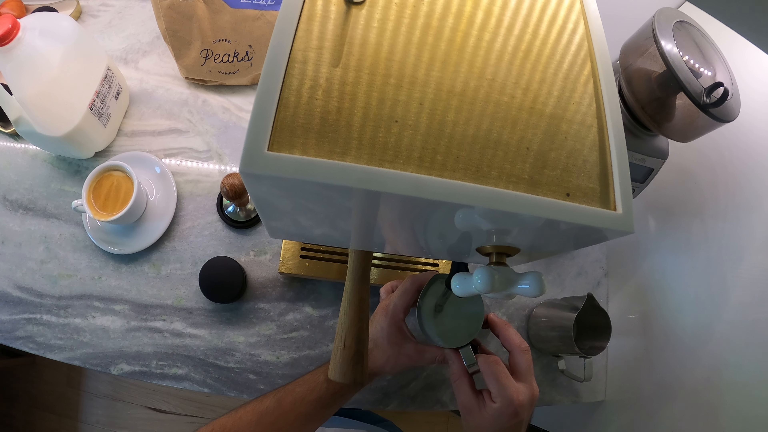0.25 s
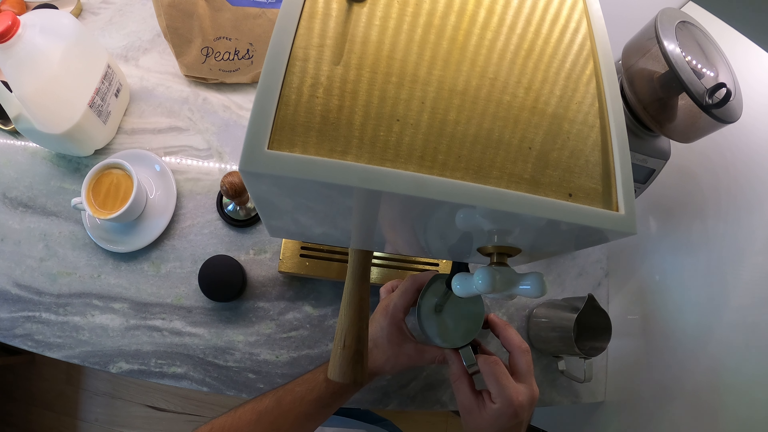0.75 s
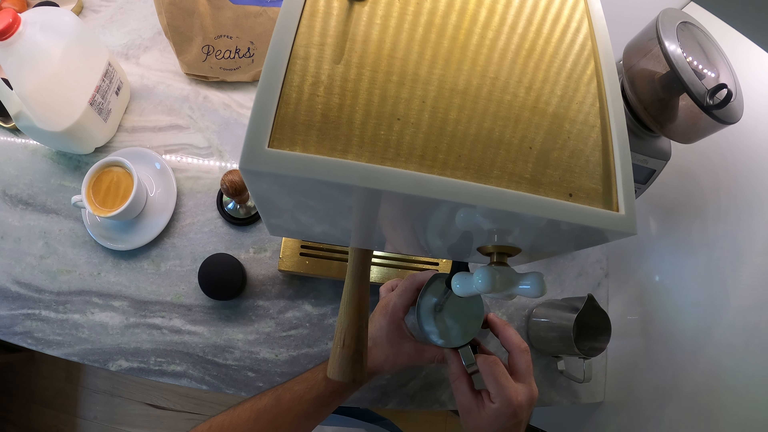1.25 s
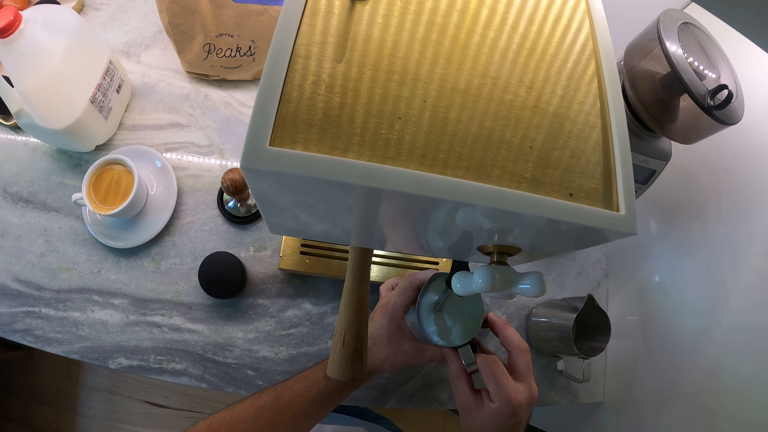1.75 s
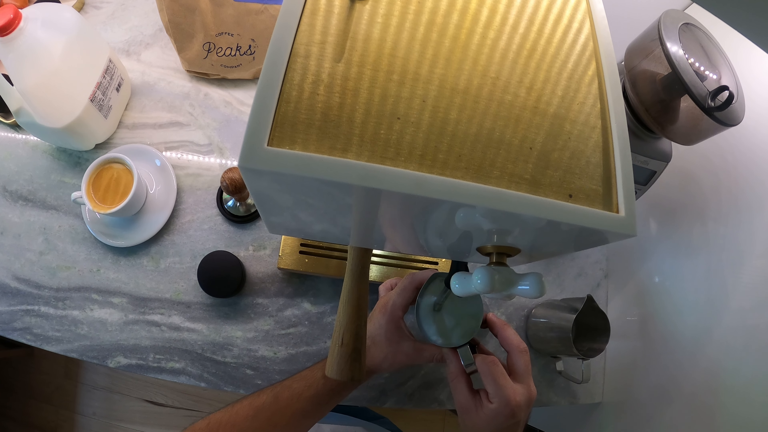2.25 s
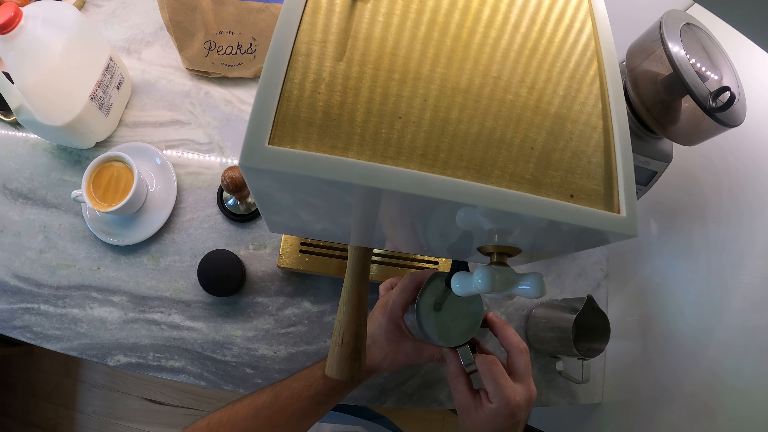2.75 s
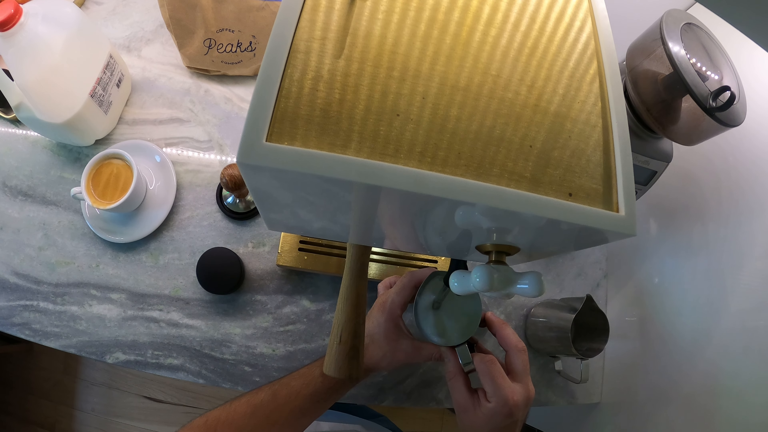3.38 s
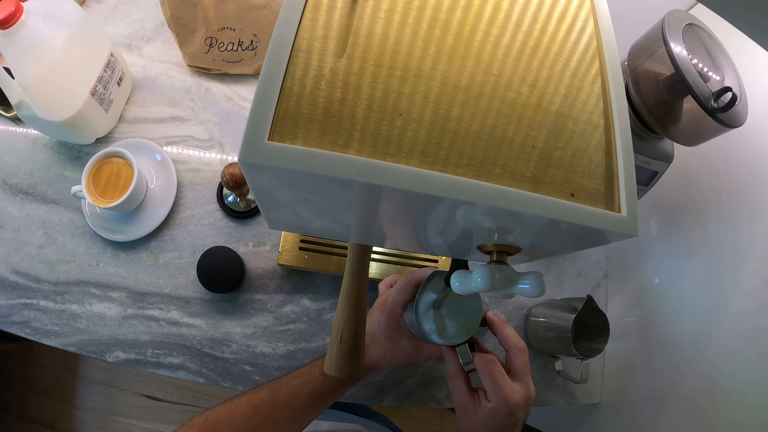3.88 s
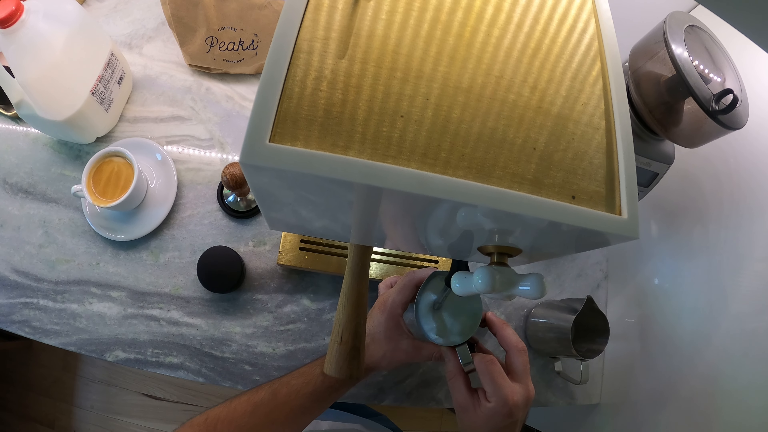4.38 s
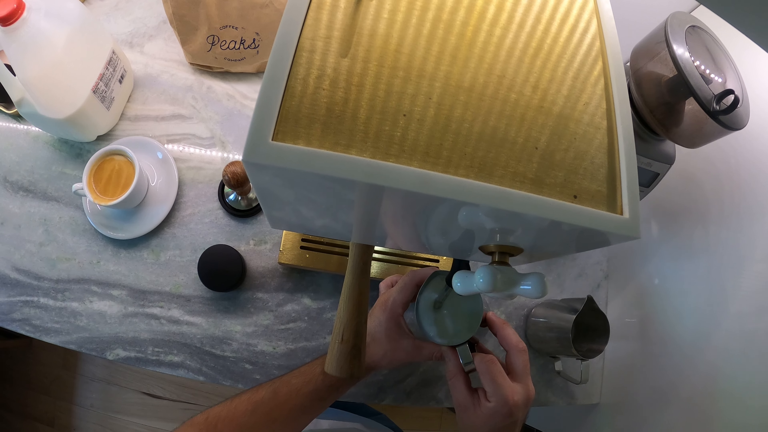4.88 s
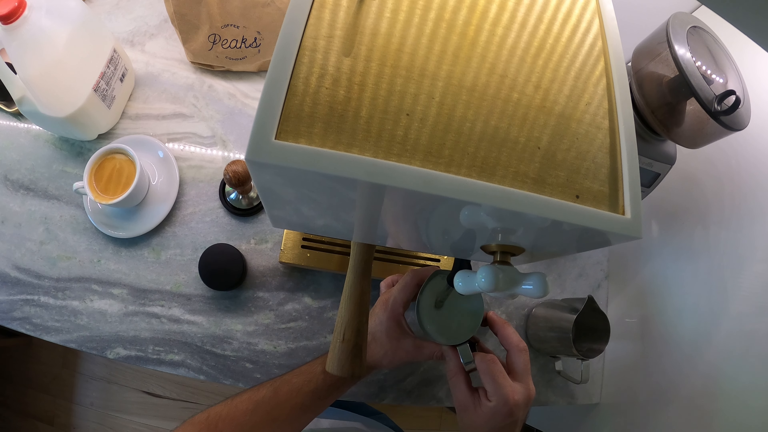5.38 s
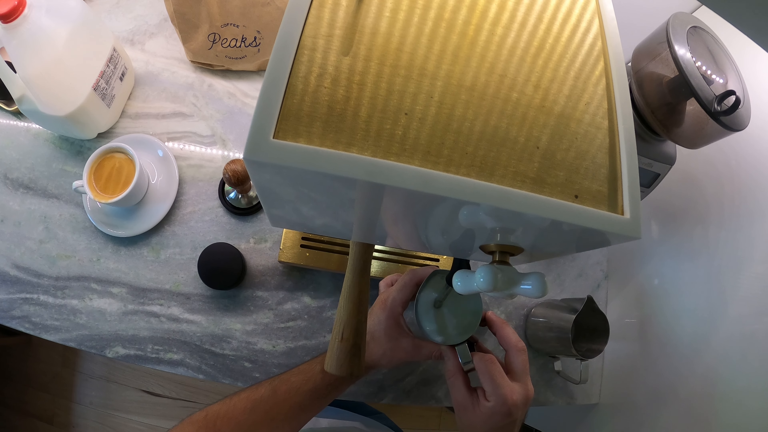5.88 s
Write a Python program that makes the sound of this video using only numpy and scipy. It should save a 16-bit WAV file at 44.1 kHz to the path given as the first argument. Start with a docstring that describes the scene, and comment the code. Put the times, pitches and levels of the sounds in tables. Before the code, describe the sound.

Milk steaming is already under way at 0 seconds and runs unbroken to about 6. A dense, bright hiss rings narrowly through a steel jug, with seething and fine fizz above and a softer roar below. Underneath, a faint low drone of swirling milk wobbles irregularly, and quick soft glugs come in runs, about five a second. Tiny bright air spits click at 0.26, 1.25 and 1.6, a sharper one at 3.6, another light one near 4.9 and the strongest at 5.0. Brief surges thicken the steam around 3.0 to 3.1. The roar gradually swells and gathers into a hoarse medium-high pitch. Around 4.35 the hiss shifts slightly lower, while from about 3.9 the drone fades under thickening foam. Close microphone, short kitchen reflections, very quiet room rumble; no ending stop.

```python
"""A steam wand heats milk in a hand-held steel jug in a kitchen.
From the start, bubble collapses ring the jug as roar, hiss and fizz, over a low drone of swirling milk
(noise bands) and a quiet room rumble; soft glugs come in runs, and the tip spits bright bursts of air.
The roar grows and gathers round one pitch as the milk warms; late on, the tip settles lower,
the jet's lower band takes over from the upper, and thickening foam fades the drone."""
import sys
import numpy as np
from scipy import signal
from scipy.fft import rfft, irfft
from scipy.io import wavfile
from scipy.ndimage import uniform_filter1d

SR = 44100
rng = np.random.default_rng(int(sys.argv[2]) if len(sys.argv) > 2 else 0)


def store_wav(level_fs):
    """Save 16-bit WAV to argv[1]."""
    pcm = np.round(np.clip(np.atleast_2d(level_fs), -1, 1) * 32767)
    wavfile.write(sys.argv[1], SR, pcm.T.astype(np.int16))


N = 270774
TIME = np.arange(N) / SR
HZ = np.maximum(np.fft.rfftfreq(N, 1 / SR), 1)


def from_db(db):
    """Decibels to amplitude gain."""
    return 10 ** (np.asarray(db) / 20)


def rms_one(x):
    """Scale to rms 1."""
    return x / np.sqrt(np.mean(x ** 2) + 1e-20)


def drift(rate_hz):
    """Slow random signal of rms 1: noise low-passed at rate_hz."""
    smooth = rfft(rng.standard_normal(N)) / (1 + (HZ / rate_hz) ** 2)
    return rms_one(irfft(smooth, N))


def colour(x, spectrum, response=1):
    """Filter x by a response and a (pitch_hz, relative_db) curve, steep beyond its ends; rms 1."""
    pitch_hz, relative_db = np.transpose(spectrum)
    ends = np.minimum(HZ / pitch_hz[0], 1) ** 4 * np.minimum(pitch_hz[-1] / HZ, 1) ** 4
    gain = from_db(np.interp(np.log(HZ), np.log(pitch_hz), relative_db))
    return rms_one(irfft(rfft(x) * response * ends * gain, N))


def steady(x, span_s):
    """Level out swells slower than the span by dividing by the running rms."""
    span = max(int(span_s * SR), 2)
    return x / np.sqrt(uniform_filter1d(x ** 2, span) + 1e-12)


def swell(middle_s, length_s):
    """Gaussian bump of height 1, length_s wide at half height."""
    return np.exp2(-np.minimum((2 * (TIME - middle_s) / length_s) ** 2, 50))


def collapses(per_s, spread_db):
    """Bubbles collapse as random impulses; a wider spread makes a few much larger than most."""
    size_db = spread_db * np.minimum(rng.exponential(1, N), 4)
    sizes = from_db(size_db) * rng.standard_normal(N)
    return sizes * (rng.random(N) < per_s / SR)


def jug_response():
    """Jug and milk resonate in narrow bands, which ring on briefly."""
    # resonances of jug and milk: pitch_hz, width_hz, lift_db (of each alone)
    resonances = [(769, 28, 5.5), (993, 32, 2), (1116, 17, 4.5), (1260, 29, 5), (1417, 30, 5.5),
                  (1490, 57, 3.5), (1721, 21, 4), (2277, 17.5, 8), (2888, 13, 10.5), (3110, 36, 4),
                  (3145, 22, 1.5), (3250, 22, 4), (3570, 60, 0.5), (3754, 61, 3.5), (3930, 21, 5.5),
                  (4095, 45, 3.5), (4350, 100, 6.5), (6490, 98, 4)]
    return 1 + sum((from_db(lift_db) - 1) / (1 + 2j * (HZ - pitch_hz) / width_hz)
                   for pitch_hz, width_hz, lift_db in resonances)


def kitchen(wet_db):
    """Room response: direct sound plus a short, exponentially decaying noise tail."""
    t60_s = 0.24
    t = TIME[:SR // 3]
    tail = rng.standard_normal(len(t)) * from_db(-60 * t / t60_s) * (t > .002)
    return 1 + from_db(wet_db) * rfft(tail / np.linalg.norm(tail), N)


def warmed_db(cold_db, change_db):
    """Level as the milk warms, from cold_db by change_db when hot."""
    hot_s, power = 6.04, 1.21
    return cold_db + change_db * (TIME / hot_s) ** power


def surges_db():
    """Steam surges (+) or chokes (-) lift or lower roar, lower jet band and upper jet band."""
    # surges of the steam: middle_s, length_s, roar_db, low_jet_db, high_jet_db
    surge_rows = [(0.125, 0.051, 1, -4, 4.5), (.23, 0.11, 0.5, 4, 0.5), (0.367, 0.082, -1, -2, -3),
                  (0.525, 0.062, -1, 2.5, 3.5), (.79, .06, 2.5, 1.5, 2), (1.113, .06, -1, 5.5, -0.5),
                  (1.3, 0.099, 1, 4.5, 2), (1.45, 0.13, -1, 0.5, -3), (1.64, 0.082, 1, 7, 1.5),
                  (2.035, 0.072, 2.5, 1.5, 0), (2.35, 0.13, 0, 6.5, 2.5), (2.47, .05, 2, -1.5, -4),
                  (2.73, 0.046, 0.5, -1, 3), (3.023, 0.047, 5, 8, 4.5), (3.113, 0.063, 6.5, 0, 5),
                  (3.187, 0.092, 1, -5, -1.5), (3.48, .1, -0.5, -2, -1), (3.606, .07, -1, 8.5, 2),
                  (3.786, 0.11, 1.5, 2, 2), (3.936, 0.077, 3.5, -2, 1), (4.07, 0.063, 3, 4, 2.5),
                  (4.21, 0.047, 0, -6, -3), (4.488, 0.049, 0, 8.5, 4.5), (4.735, .07, -0.5, 5, 3),
                  (4.883, .06, -0.5, 2.5, 4), (5.002, 0.046, 1, 0.5, 2), (5.06, 0.057, -5, 3.5, -1),
                  (5.167, 0.11, -2, 0, -1), (5.267, 0.039, 2, 1, 7), (5.327, 0.044, 1.5, 3.5, 2),
                  (5.61, .08, 0.5, 5, -0.5), (5.74, 0.055, 1.5, 0, 1.5), (6.09, .1, 1.5, 2.5, 2)]
    return sum(np.outer(lifts_db, swell(middle_s, length_s))
               for middle_s, length_s, *lifts_db in surge_rows)


def gathered(roar):
    """As the milk warms, the roar's middle grows at the cost of its edges; the level stays."""
    pitch_hz, width_hz = 1686, 450
    middle = irfft(rfft(roar) / (1 + 2j * (HZ - pitch_hz) / width_hz), N)
    extra = from_db(warmed_db(cold_db=-2.0, change_db=6.5)) - 1
    return steady(roar + extra * middle, span_s=0.81)


def wand():
    """Collapses under the milk roar and seethe, the jet hisses in two bands, fine foam fizzes."""
    # spectra of the five voices: pitch_hz, relative_db
    roar_spectrum = [(330, -32.5), (540, -22.5), (630, -26.5), (770, -18.5), (850, -25), (950, -7),
                     (1180, -6), (1440, -4), (1620, -3.5), (1830, -2), (1950, -10.5), (2300, -13.5),
                     (2800, -9.5), (3600, -58)]
    low_jet_spectrum = [(1700, -54), (2250, -17.5), (2600, -14.5), (2850, -15), (2980, 2), (3150, 1.5),
                        (3330, 2.5), (3480, -6), (4300, -30)]
    high_jet_spectrum = [(2200, -29.5), (3200, -26), (3430, -9), (3550, -0.5), (3760, -3), (3930, -8.5),
                         (4050, -13.5), (4600, -20.5), (7000, -41.5)]
    seethe_spectrum = [(2200, -7), (3000, -11), (3700, -10), (4120, -1), (4400, -1.5), (4750, 0.5),
                       (5200, -1), (5500, -5), (6200, -20), (7500, -24), (10000, -30.5)]
    fizz_spectrum = [(4000, -27), (5800, 7), (6600, 3.5), (7050, 0), (7700, 0.5), (8050, -6), (8600, -2.5),
                     (8900, -7.5), (9900, -8), (11300, -24.5), (11800, -17.5), (13100, -24.5), (15600, -34)]
    settle_s, settle_takes_s = 4.35, 0.092
    seethe_follows, fizz_follows = 0.58, .2  # share of the upper jet band's surges
    flutter_hz = 17

    roar_surge_db, low_surge_db, high_surge_db = surges_db()
    # the tip settles lower: 0 before, 1 after
    settled = np.clip((TIME - settle_s) / settle_takes_s + .5, 0, 1)
    roar_db = warmed_db(-39.5, 8.0) + roar_surge_db
    low_db = warmed_db(-38, 0) + low_surge_db + 3.5 * settled
    high_db = warmed_db(-35.5, 1) + high_surge_db - 1.7 * settled
    seethe_db = warmed_db(-41, 3.5) + seethe_follows * high_surge_db + 1.5 * settled
    fizz_db = warmed_db(-43, -3.5) + fizz_follows * high_surge_db
    path = jug_response() * kitchen(wet_db=-10.5)
    sputter = drift(26)

    def voice(bubbles, spectrum, sputter_db, flutter_db):
        """One size of bubble through jug and room; sputter is shared, flutter is its own."""
        waver_db = sputter_db * sputter + flutter_db * drift(flutter_hz)
        flow = steady(colour(bubbles, spectrum, path), span_s=0.088)
        return rms_one(flow * from_db(waver_db))

    roar = voice(collapses(per_s=9000, spread_db=0.5), roar_spectrum, sputter_db=0.92, flutter_db=.5)
    low_jet = voice(collapses(per_s=11000, spread_db=1.5), low_jet_spectrum,
                    sputter_db=-1.0, flutter_db=2.27)
    high_jet = voice(collapses(per_s=12000, spread_db=0.0), high_jet_spectrum,
                     sputter_db=2.02, flutter_db=0.33)
    seethe = voice(collapses(per_s=12000, spread_db=1.0), seethe_spectrum,
                   sputter_db=0.2, flutter_db=1.47)
    fizz = voice(collapses(per_s=20000, spread_db=0.0), fizz_spectrum, sputter_db=0.0, flutter_db=1.4)

    out = from_db(roar_db) * gathered(roar)
    out += from_db(low_db) * low_jet + from_db(high_db) * high_jet
    return out + from_db(seethe_db) * seethe + from_db(fizz_db) * fizz


def swirl():
    """The turning milk drones in the hollow of the jug and churns; both fade as the foam thickens."""
    # spectra: pitch_hz, relative_db
    drone_spectrum = [(200, -22.5), (220, -19.5), (243, 3.5), (257, 0.5), (272, -1.5), (295, -34.5)]
    churn_spectrum = [(120, -19), (150, -4.5), (185, -10), (200, 6.5), (218, -9), (320, -8.5), (410, -0.5),
                      (490, -13.5), (600, -26)]
    # the drone swells (+) or stalls (-) as the milk sloshes: middle_s, lift_db
    slosh_rows = [(.06, 8), (.53, 7), (.62, 6), (.86, -16), (1.35, 9.5), (1.6, -12), (1.81, 7), (2.0, 9.5),
                  (2.46, 9.5), (2.75, -19), (3.01, 8), (3.13, 10), (3.5, 8), (3.99, 10), (4.18, 5),
                  (4.29, 5), (4.51, -3.5), (4.73, 11), (4.87, -23), (5.04, 7), (5.23, 9.5), (5.37, -10),
                  (5.7, -6), (5.8, 11.5), (5.92, 13)]
    slosh_s = 0.041
    thicken_s, thicken_db_per_s = 3.85, -4.0
    churn_follows = 0.42  # share of the drone's swells

    fade_db = thicken_db_per_s * np.maximum(TIME - thicken_s, 0)
    slosh_db = sum(lift_db * swell(middle_s, slosh_s) for middle_s, lift_db in slosh_rows)
    slosh_db = slosh_db + 2 * drift(11.3)
    drone_db = -50.5 + fade_db + slosh_db
    churn_db = -56.5 + 0.73 * fade_db + churn_follows * slosh_db
    drone = steady(colour(rng.standard_normal(N), drone_spectrum), span_s=0.062)
    churn = steady(colour(rng.standard_normal(N), churn_spectrum), span_s=0.34)
    return from_db(drone_db) * drone + from_db(churn_db) * churn


def room_rumble():
    """Quiet steady low noise of the room."""
    # spectrum: pitch_hz, relative_db
    rumble_spectrum = [(20, -0.5), (45, -6), (80, -14.5), (150, -7), (500, -31), (2000, -32)]
    return from_db(-63.0) * colour(rng.standard_normal(N), rumble_spectrum)


def glugs(swell_s, uneven_db):
    """Short low noise thuds swell and die away, one per turn of the milk, at uneven strength."""
    # runs of glugs: first_peak_s, end_s, level_db (before the uneven strength)
    run_rows = [(0.062, .7, -54), (0.945, 1.04, -52), (1.226, 2.4, -52.5), (2.582, 2.67, -51.5),
                (2.988, 3.08, -55), (3.297, 4.47, -55.5), (5.042, 5.33, -56.5), (5.633, 6.08, -61)]
    turn_s = .182
    thud_spectrum = [(60, -9), (100, -6), (150, 4.5), (180, 0.5)]  # pitch_hz, relative_db

    push = np.zeros(N)
    thud = steady(colour(rng.standard_normal(N), thud_spectrum), span_s=0.024)
    strength_db = uneven_db * drift(1 / turn_s)
    for first_peak_s, end_s, level_db in run_rows:
        for peak_s in np.arange(first_peak_s, end_s, turn_s):
            age = np.clip((TIME - peak_s) / swell_s + 1, 0, 50)  # 1 at the peak
            push += from_db(level_db) * age * np.exp(1 - age)
    return push * from_db(strength_db) * thud


def spits(fall_s, ragged_db, lead_s, lead_db):
    """Air torn in at the tip: a faint hiss as the milk thins over it, then a bright ragged burst."""
    # spits: start_s, rise_s, length_s (start to fall), level_db, edge_hz (high-pass)
    spit_rows = [(0.258, .001, .007, -34.5, 8500), (0.268, .001, 0.0023, -35, 6500),
                 (1.249, 0.024, 0.026, -40.5, 6000), (1.62, 0.0052, 0.013, -36, 6500),
                 (2.37, 0.026, 0.042, -49, 4000), (3.05, .04, 0.051, -48, 3000),
                 (3.24, .015, 0.028, -53, 5000), (3.625, .003, 0.035, -30, 3600),
                 (4.42, .012, 0.016, -45, 5000), (4.867, .014, .016, -40.5, 3500),
                 (5.026, .001, 0.026, -28.5, 4200)]
    # spray: pitch_hz, relative_db
    spray_spectrum = [(2000, -19), (3200, 16), (4500, 15), (7000, 13), (9800, 12.5), (11300, -2.5),
                      (12600, 1.5), (14500, -6), (15700, -10)]

    spray = colour(collapses(per_s=18000, spread_db=3.5), spray_spectrum)
    spray = spray * from_db(ragged_db * drift(120))
    out = np.zeros(N)
    for start_s, rise_s, length_s, level_db, edge_hz in spit_rows:
        near = np.abs(TIME - start_s) < .25
        age_s = TIME[near] - start_s
        lead = from_db(lead_db) * np.exp(-np.abs(age_s) / lead_s)
        rise = np.clip(age_s / rise_s, 0, 1)
        # softer starts also end more softly
        fall = np.exp(-np.maximum(age_s - length_s, 0) / (fall_s + 0.73 * rise_s))
        high_pass = signal.butter(2, edge_hz, "high", fs=SR, output="sos")
        bright = rms_one(signal.sosfilt(high_pass, spray[near]))
        out[near] += from_db(level_db) * (lead + rise * fall) * bright
    return irfft(rfft(out) * kitchen(wet_db=-10), N)


def scene():
    """Wand, moving milk and spits over the quiet rumble of the room."""
    milk = swirl() + glugs(swell_s=0.016, uneven_db=2.0)
    spitting = spits(fall_s=0.0049, ragged_db=2.5, lead_s=0.026, lead_db=-14)
    return (wand() + milk + room_rumble() + spitting)[None]


def record(dry):
    """Cut the top steeply with an elliptic low-pass."""
    cutoff_hz = 15750
    low_pass = signal.ellip(12, .1, 90, cutoff_hz, fs=SR, output="sos")
    return signal.sosfilt(low_pass, dry)


dry = scene()
out = record(dry)
store_wav(out)
```